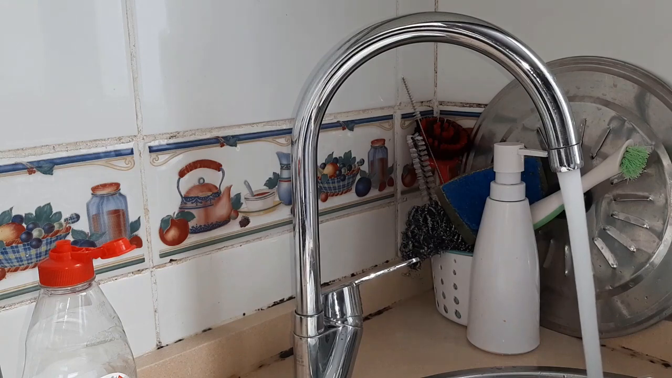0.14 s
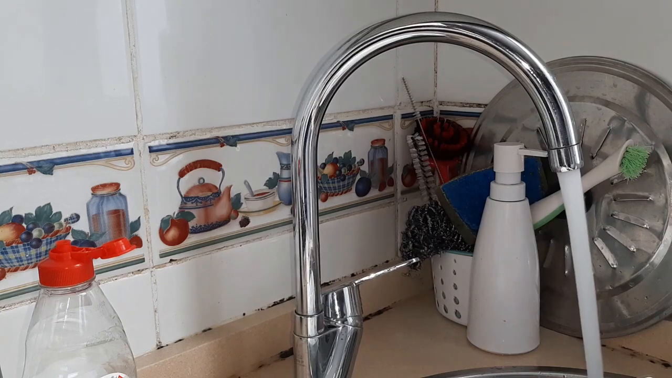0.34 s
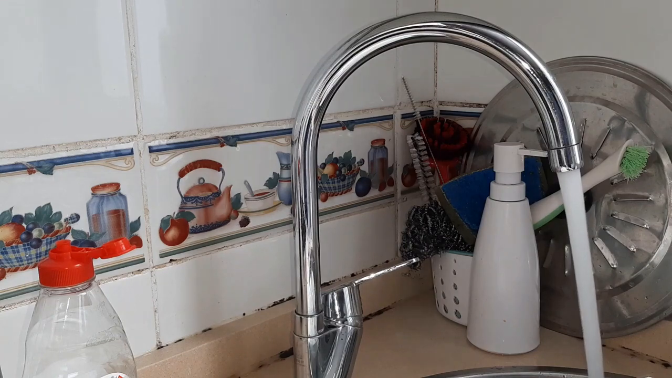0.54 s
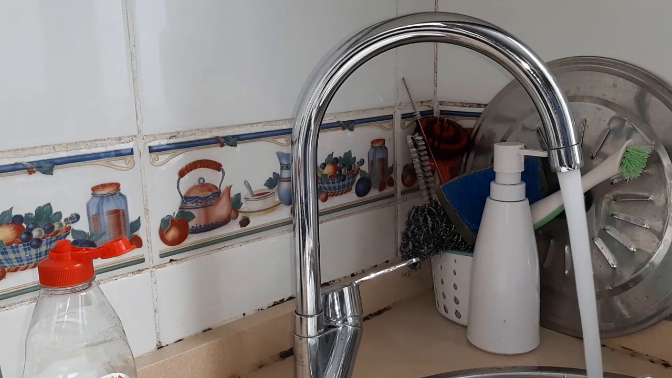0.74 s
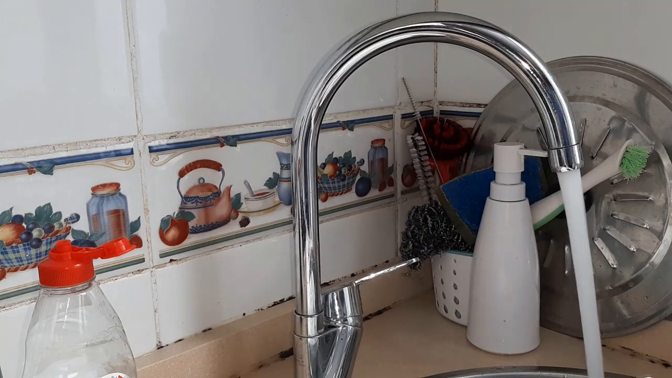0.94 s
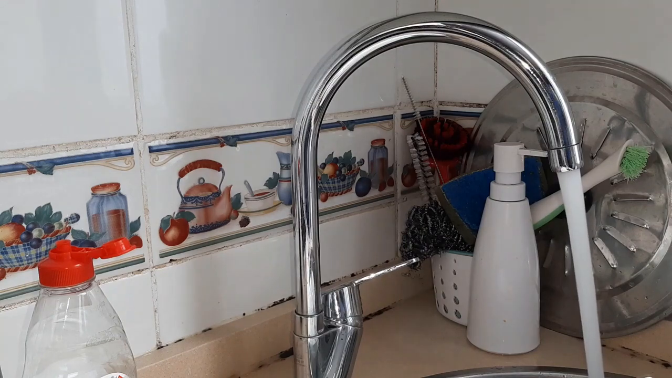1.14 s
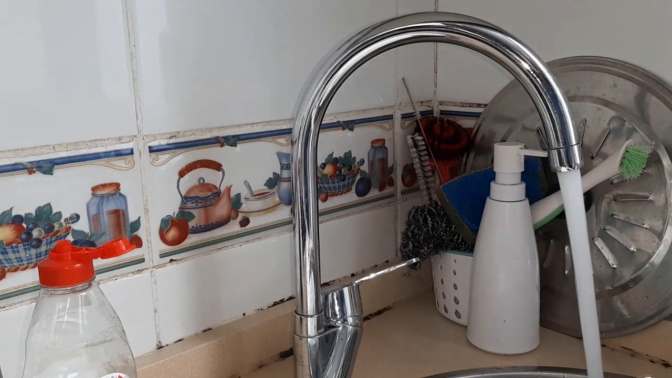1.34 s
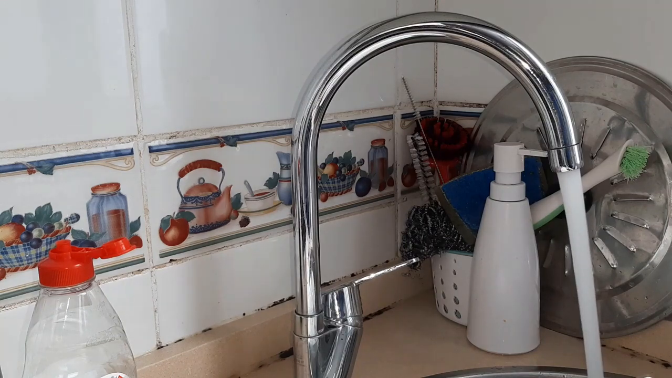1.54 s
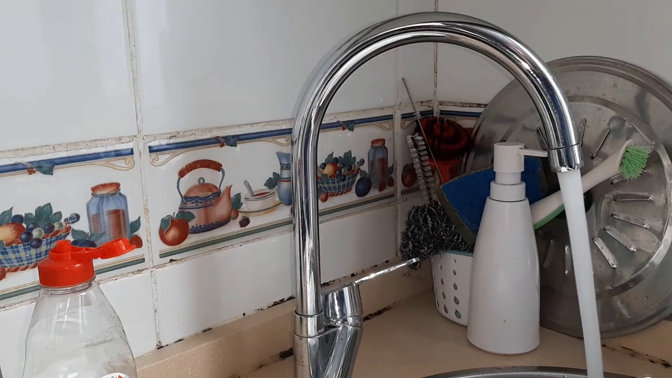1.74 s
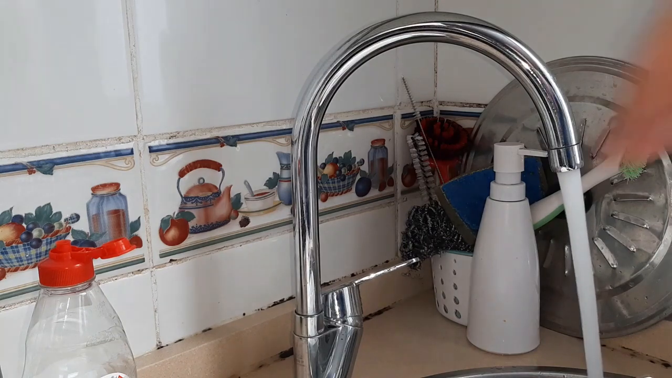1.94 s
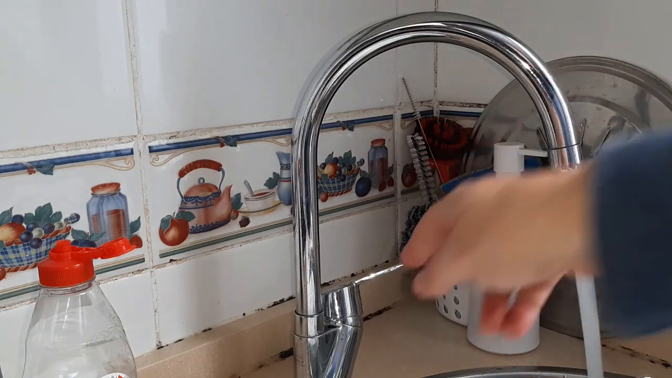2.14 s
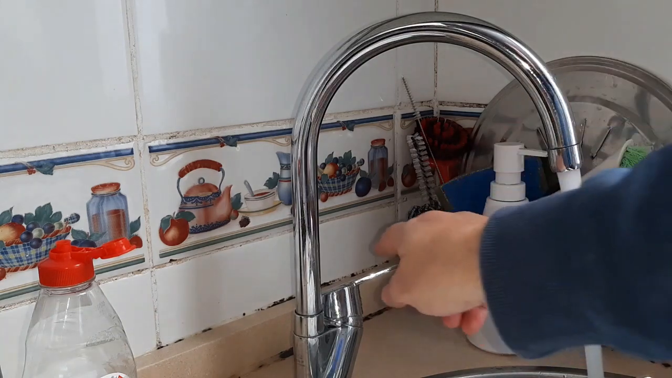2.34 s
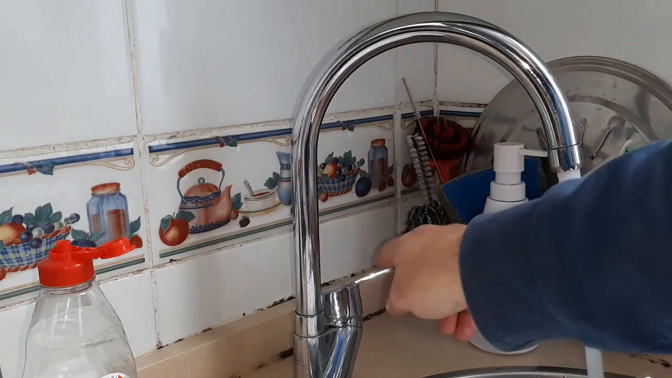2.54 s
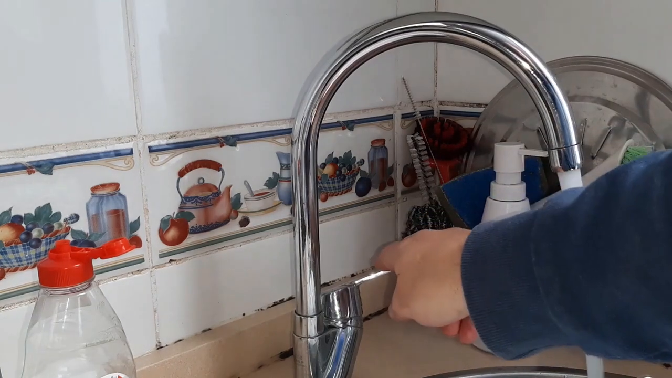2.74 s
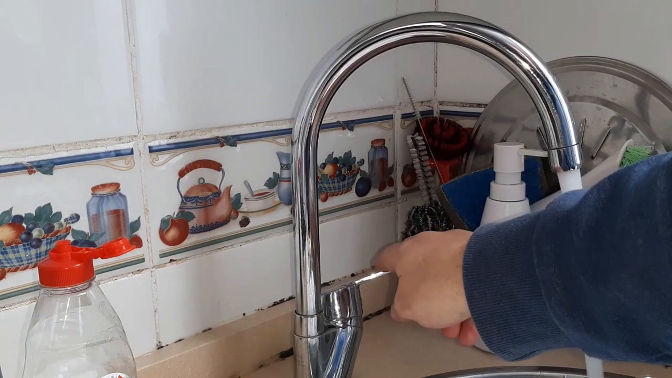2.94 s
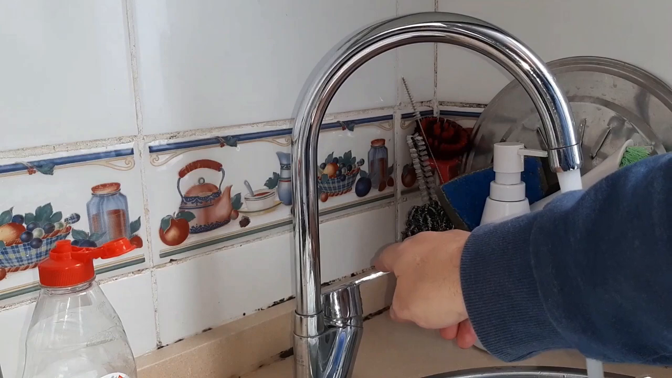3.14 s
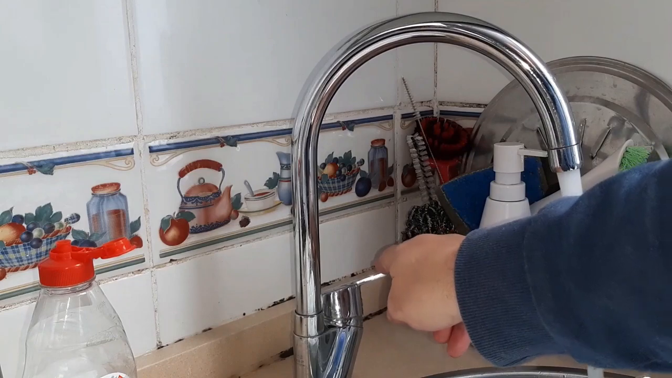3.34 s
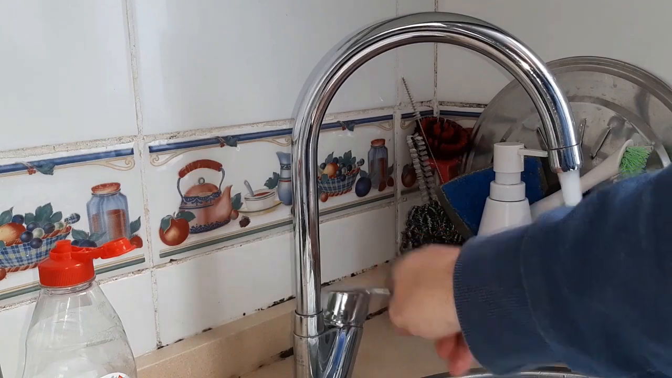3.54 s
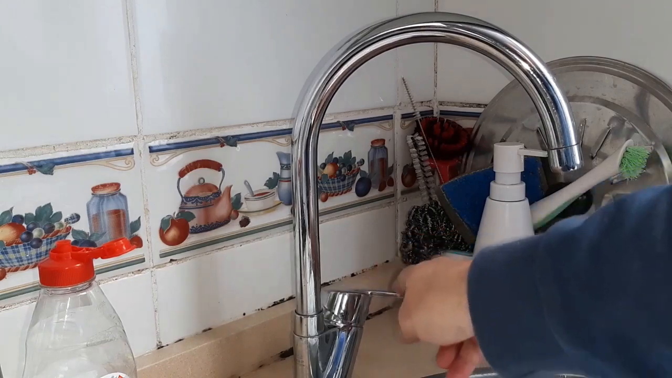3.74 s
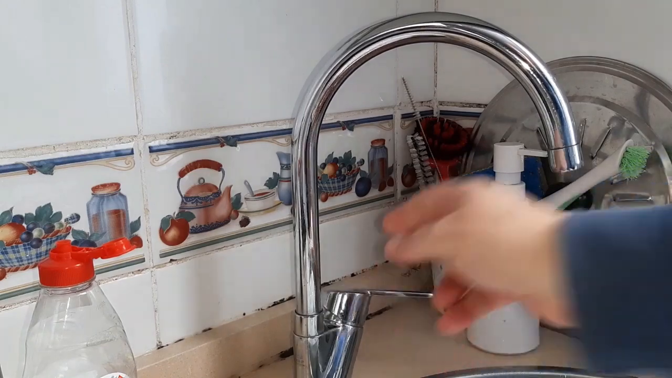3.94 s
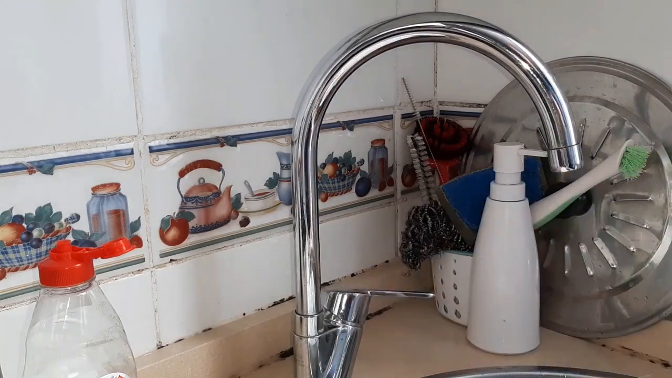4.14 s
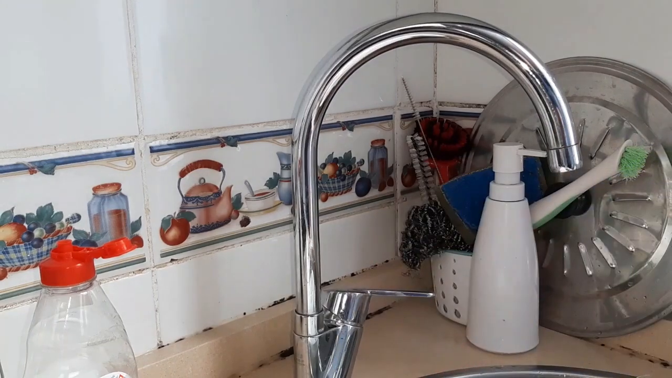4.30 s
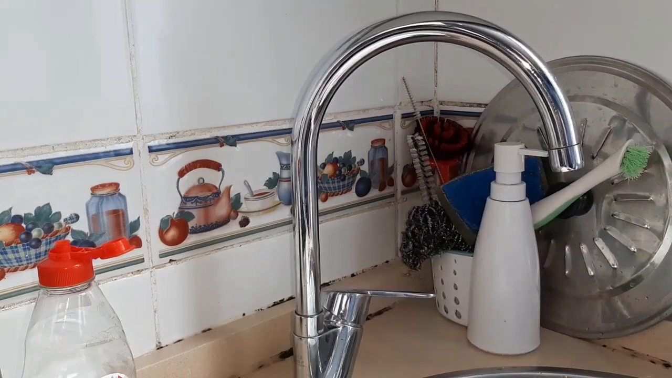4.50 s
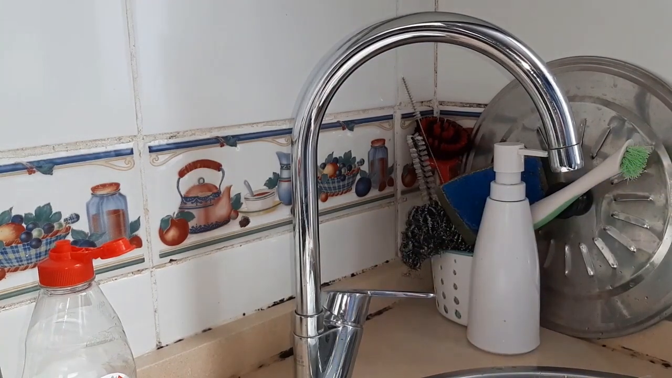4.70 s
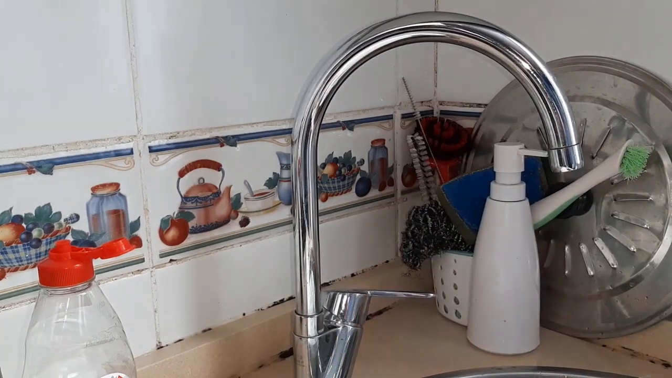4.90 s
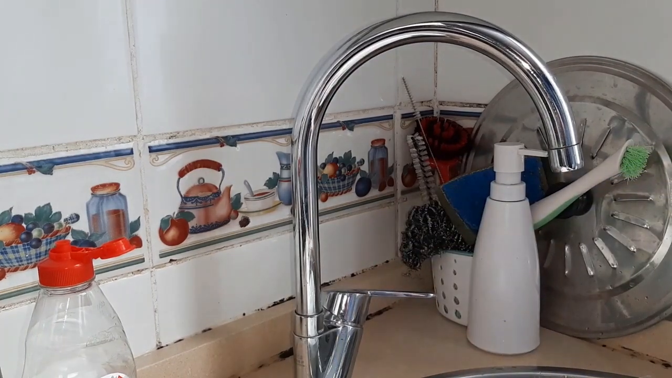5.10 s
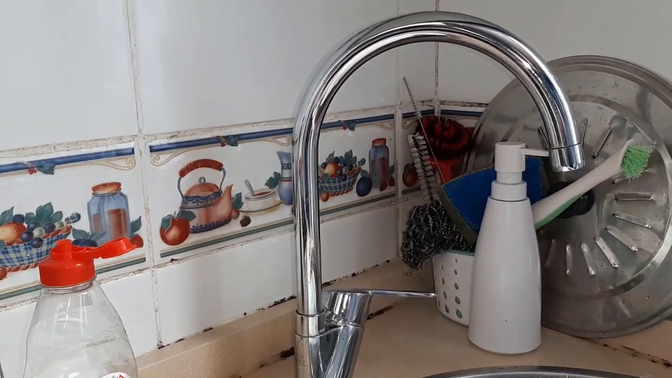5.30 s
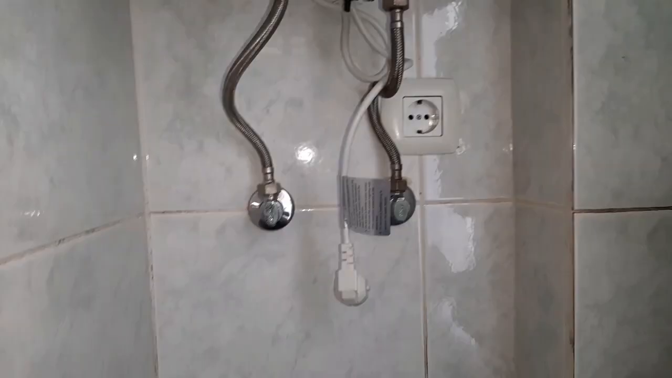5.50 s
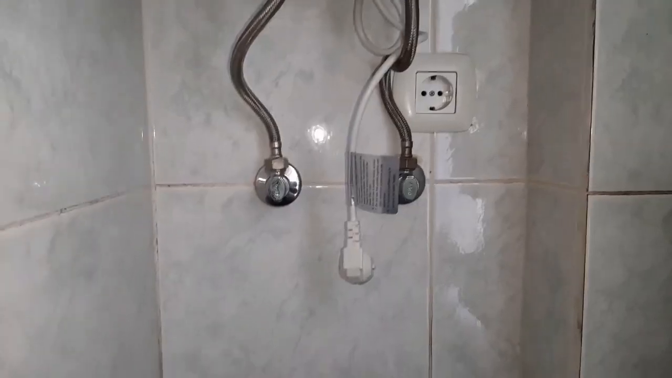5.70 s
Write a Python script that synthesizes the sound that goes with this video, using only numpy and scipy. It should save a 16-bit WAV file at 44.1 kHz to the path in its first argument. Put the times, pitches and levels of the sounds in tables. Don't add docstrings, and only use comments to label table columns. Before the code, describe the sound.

Uneven slugs of water beat a resonant metal sink for under four seconds while spray and aerator hiss steadily. The flow breaks off in a few stuttering thuds. Then come sparse plinking drips, a soft fizz and plughole gurgles, with fridge hum beneath. The phone is knocked softly, sound drops out, and a faint tiled room with a short high valve whistle fades in. Close stereo phone pickup.

```python
import sys
import numpy as np
from scipy import signal
from scipy.fft import rfft, irfft
from scipy.io import wavfile
from scipy.ndimage import uniform_filter1d

SR = 44100
rng = np.random.default_rng(int(sys.argv[2]) if len(sys.argv) > 2 else 0)


def level_to_linear(level):
    exponent = np.asarray(level, float) / 20
    return 10 ** exponent


def generate_wav(sig):
    pcm = np.round(np.clip(np.atleast_2d(sig).T, -1, 1) * 32767).astype(np.int16)
    wavfile.write(sys.argv[1], SR, pcm)


N = 254016
T = np.arange(N) / SR
HZ = np.maximum(np.fft.rfftfreq(N, 1 / SR), 1)

# time in seconds, spray level in dB, drumming of the steel against it in dB.
FLOW = [(0.0, -39.5, 9), (0.14, -39.5, 1), (1.0, -39, 2.5), (2.08, -39.5, 1.5), (2.36, -40.5, 1),
        (2.63, -40, 3.5), (3.0, -40, 3), (3.3, -40.5, 5), (3.47, -39, 0.5), (3.54, -42.5, 12),
        (3.57, -41, -4), (3.61, -42.5, 7.5), (3.65, -49.5, 19.5), (3.68, -42, 3), (3.71, -44, 13.5),
        (3.76, -49, 11.5), (3.98, -64.5, -14)]
# start in seconds, peak in dB, splash against it in dB.
SLUGS = [(0.057, -29.5, -7.5), (0.138, -26.5, -0.5), (0.202, -19.5, -11), (0.288, -26.5, -15),
         (0.321, -33, -25), (0.484, -28.5, -2), (0.648, -36, -13), (0.721, -25, -27), (0.754, -27.5, -15),
         (0.794, -26.5, -27), (0.85, -42, -19), (0.935, -31, -3), (0.959, -29.5, -27), (1.009, -28, -10),
         (1.05, -28, -7), (1.144, -29, -9), (1.195, -24, -11), (1.322, -26, -22), (1.379, -40, -13),
         (1.443, -40, -9), (1.472, -28, 0.5), (1.497, -29.5, 0), (1.532, -44, 1), (1.568, -27.5, -11),
         (1.668, -19.5, -9), (1.78, -28, -5), (1.824, -44.5, -14), (1.962, -24, -13.5), (2.089, -27, -2),
         (2.116, -27, -14), (2.28, -41, -8), (2.335, -44, -8), (2.392, -30, -19), (2.432, -20.5, -8),
         (2.469, -26, -11), (2.519, -50, -12), (2.634, -46, -13), (2.701, -20, -14.5), (2.753, -24, -12),
         (2.83, -29.5, -5), (2.896, -29.5, -10), (2.975, -25, -21), (3.083, -37, -16), (3.123, -24, -10.5),
         (3.174, -39, -16), (3.207, -44, -17), (3.228, -19.5, -13), (3.311, -25, -24), (3.366, -42, -16),
         (3.483, -33.5, -11), (3.522, -23.5, -13), (3.578, -23, -27), (3.601, -33, -16), (3.628, -28, -9),
         (3.695, -21.5, 1), (3.716, -24.5, -8.5)]
# start in seconds, peak in
# dB, pitch in Hz.
PLOPS = [(0.064, -24, 1030), (1.333, -24, 547), (0.18, -31.5, 964), (0.223, -24.5, 807), (0.292, -26, 812),
         (0.331, -28, 790), (0.416, -34, 790), (0.446, -27.5, 815), (0.483, -26, 973), (0.539, -33.5, 1020),
         (0.619, -47, 770), (0.65, -31, 770), (0.732, -36, 880), (0.761, -45, 840), (0.799, -25, 762),
         (0.848, -35, 810), (1.583, -21, 530), (1.146, -26, 800), (1.197, -27, 1060), (1.312, -31, 810),
         (1.397, -27, 796), (1.481, -33, 774), (1.51, -40, 970), (1.542, -32, 840), (1.575, -32, 800),
         (1.665, -24, 758), (1.739, -26.5, 770), (1.992, -31, 1166), (2.092, -28, 760), (2.206, -28, 1390),
         (2.264, -37, 804), (2.397, -25, 801), (2.429, -26.5, 755), (2.571, -36, 1010), (2.678, -40, 820),
         (2.707, -32.5, 950), (2.869, -39, 880), (2.895, -55, 754), (2.934, -30, 1030), (3.033, -31, 1005),
         (3.073, -29, 770), (3.104, -22.5, 780), (3.164, -32, 1020), (3.211, -31, 746), (3.237, -22.5, 812),
         (3.339, -37, 780), (3.531, -33, 800), (3.591, -31, 745), (3.632, -45, 720), (3.693, -34, 783)]
# start in seconds, peak in dB, pitch in Hz, T60 in
# seconds.
HAMMER = [
    (3.626, -29.5, 101, 0.3),
    (3.627, -34.5, 140, 0.087),
    (3.534, -23.5, 530, .12),
    (3.546, -23, 450, 0.035),
    (3.694, -22.5, 545, 0.053),
    (3.735, -25, 577, 0.059),
]
# start in seconds, peak in dB, pitch in Hz.
RINGS = [(0.057, -25, 515), (0.136, -34, 526), (0.203, -28, 556), (0.29, -33, 484), (0.32, -28, 558),
         (0.484, -26, 533), (0.721, -24, 509), (0.794, -35.5, 540), (0.851, -28.5, 460), (0.959, -24, 501),
         (1.009, -31.5, 576), (1.05, -31.5, 452), (1.143, -39, 515), (1.323, -36.5, 526),
         (1.379, -36.5, 471), (1.442, -44, 560), (1.471, -31, 537), (1.532, -35, 584),
         (1.567, -28.5, 542.6), (1.668, -36, 460), (1.78, -36.5, 555), (1.962, -28.5, 535),
         (2.089, -24, 516.4), (2.116, -31, 528), (2.335, -42, 495), (2.392, -26, 521), (2.432, -33, 544),
         (2.47, -37, 526), (2.52, -31.5, 403), (2.634, -35, 547), (2.753, -25, 517), (2.831, -32, 532),
         (2.896, -28, 531), (2.975, -23.5, 518), (3.123, -28.5, 571), (3.228, -34, 565), (3.366, -38, 400),
         (3.483, -30, 534)]
# start in seconds, peak in dB, pitch in Hz.
TICKS = [(0.059, -30, 1250), (0.13, -29, 1380), (0.182, -28, 1650), (0.2299, -32, 1520),
         (0.465, -29.5, 2340), (0.602, -41, 1980), (0.7576, -32, 1280), (0.8215, -33, 1380),
         (0.8749, -33.5, 1700), (0.9015, -30.5, 1550), (1.0803, -24, 1350), (1.3548, -35, 2400),
         (1.4296, -35, 2150), (1.481, -29, 1610), (1.6681, -31, 1290), (1.9719, -39, 1980),
         (2.0817, -28.5, 2000), (2.2787, -33, 2060), (2.3347, -31, 1710), (2.5296, -37, 2090),
         (2.577, -36, 1990), (2.7402, -29, 2260), (2.9866, -41, 2290), (3.0467, -29.5, 1710),
         (3.1752, -33, 1580), (3.234, -36, 1670), (3.3355, -38, 2000)]
# start in seconds, peak in dB, pitch in Hz.
THUDS = [(0.041, -43.5, 217), (0.323, -47, 140), (0.409, -40.5, 172.5), (0.659, -43.5, 306), (1, -43, 218),
         (1.481, -47, 177), (1.662, -52, 286), (1.788, -49, 201), (2.088, -39, 159), (2.583, -40, 322),
         (2.707, -47.5, 256), (3.299, -36, 326), (3.418, -46.5, 275), (3.516, -41, 294), (3.586, -45, 266),
         (3.729, -42, 257)]
# pitch in Hz, width in Hz, level in dB.
BOWL_MODES = [(399, 14.7, -2), (453.5, 21, -1.5), (509.4, 27.6, 2.5), (560, 22.4, 0), (606, 30, -8.5),
              (760, 19.6, -3.5), (825.4, 44, -6.5), (951, 33, -9.5), (1020, 47, -6.5), (1362, 61, -13.5),
              (1501, 50, -11.5), (1687, 17, -5), (1960, 11, -6), (2157, 69, -17)]
# pitch in Hz, width in Hz, level in dB.
COUNTER_MODES = [(80, 16.2, 0.5), (99.2, 26.2, 1), (116.7, 47.5, -4.5), (183, 52, -6), (250, 188, -11.5)]
# time in seconds, level in dB.
SURGES = [(0.076, -55), (0.198, -31), (0.309, -37), (0.416, -46.5), (0.575, -47), (0.575, -41.5),
          (0.707, -38), (0.707, -38.5), (0.787, -56), (0.893, -51.5), (0.972, -48), (1.067, -39.5),
          (1.219, -40), (1.27, -51), (1.428, -61), (1.429, -44), (1.491, -41.5), (1.676, -35), (1.676, -32),
          (1.76, -69), (1.824, -43.5), (2.02, -34), (2.161, -33), (2.299, -41), (2.426, -39), (2.585, -45),
          (2.692, -40), (2.769, -30.5), (2.901, -40), (2.96, -39), (3.084, -33), (3.213, -31),
          (3.39, -32.5), (3.527, -31)]
# frequency in Hz, density in dB per Hz.
SPRAY_COLOUR = [(150, -16), (300, -4.5), (700, -2.5), (1500, -3.5), (2500, -2), (3500, -3), (4600, -4),
                (5600, -3), (8000, -7.5), (9000, -7.5), (11000, -8.5), (17000, -12.5)]
# frequency in Hz, density in dB per Hz.
AERATOR_COLOUR = [(6000, -11), (9000, -6), (10500, -7), (12000, -2.5), (13200, 0), (14300, -0.5),
                  (15500, 1.5), (17000, -8.5)]
# frequency in Hz, width in Hz, level of the removed part in dB.
BOWL_NODE = (345, 35, -3)
# time in seconds, pitch in Hz.
HUM_PITCH = [(0, 100.2), (5.52, 99.65)]
# frequency in Hz, density in dB per Hz.
RUMBLE_COLOUR = [(15, -52), (25, -5), (48, -18), (102, -1.5), (125, -14), (198, -26), (254, -9.5),
                 (300, -16.5), (390, -55), (660, -120)]
# time in seconds, fizz level in dB.
FILM = [(3.75, -68), (3.9, -71), (4.0, -58.5), (4.2, -57.5), (4.47, -58.5), (4.65, -61), (5.05, -65.5),
        (5.2, -68.5), (5.52, -72)]
# frequency in Hz, density in dB per Hz.
FIZZ_COLOUR = [(850, -8), (1350, -14), (1750, -29), (2150, -11), (2850, -19), (3800, -6), (8070, -4.5),
               (15200, -5), (15900, -6), (16500, -38.5)]
# frequency in Hz, density in dB per Hz.
PLUGHOLE_COLOUR = [(82, 0), (140, 4), (177, -28), (257, -3), (382, -3), (494, -6.5), (1800, -14),
                   (2340, -48), (3960, -120)]
# start in seconds, level in dB.
GULPS = [
    (3.758, -41.5),
    (3.93, -65),
    (4.04, -83),
    (4.182, -57),
    (4.42, -60.5),
    (4.69, -67),
]
# frequency in Hz, width in Hz, level of the removed part in dB.
TRAP_BANDS = [(885, 320, -1), (2900, 680, -5)]
# start in seconds, peak in dB, pitch in Hz, width as a share of the pitch.
DRIPS = [(3.694, -29, 1994, 0.4), (3.712, -31, 4000, 0.17), (3.801, -35, 6800, 0.2),
         (3.815, -40, 2200, 0.18), (3.892, -37, 3950, 0.2), (3.893, -40, 7000, .13),
         (4.056, -42, 3060, .098), (4.181, -45, 345, 0.68), (4.183, -65, 169, 0.69),
         (4.186, -51, 1182, 0.14), (4.209, -40, 9600, 0.24), (4.354, -39, 2765, 0.44),
         (4.37, -37, 4070, 0.32), (4.373, -38, 5230, 0.63), (4.396, -43, 1960, .95),
         (4.412, -42, 1395, 0.96), (4.44, -43, 2560, 0.8), (4.427, -41.5, 998, 0.96),
         (4.489, -44, 2290, 0.31), (4.647, -40, 3280, 0.27), (4.648, -42, 2420, 0.24),
         (4.65, -44, 4940, 0.33), (4.548, -52, 1320, .3), (4.651, -53.5, 897, 0.37),
         (4.897, -47, 2690, .08), (4.893, -50, 4630, .12), (4.947, -49, 1910, 0.15), (4.96, -50, 1930, .12),
         (4.896, -52, 3250, .08), (4.977, -53, 6470, .15), (4.99, -56, 1750, .3), (5.03, -48.5, 1480, 0.11),
         (5.035, -48, 6500, .6), (5.096, -66, 1920, .5), (5.1, -59, 5300, 0.18), (5.315, -58, 2070, 0.046),
         (5.326, -52, 5070, 0.35), (5.348, -53, 2100, 0.038), (5.37, -65, 1390, .15),
         (5.406, -60, 1400, .1), (5.44, -63, 2170, .04), (5.421, -54, 4670, .2), (5.015, -51, 1470, 0.1),
         (5.035, -48, 4000, .06), (5.064, -46.5, 1497, 0.097), (5.068, -53, 1870, 0.11),
         (5.097, -47, 6560, 0.4), (5.177, -51, 1510, 0.11), (5.118, -56, 3940, .15),
         (5.14, -63, 3900, 0.11), (5.421, -49, 7700, 0.34)]
# start in seconds, level in dB, pitch in Hz, T60 in seconds, swell in seconds.
BUMPS = [
    (5.3403, 6.5, 232, .015, .03),
    (5.3484, -7, 298, .022, .014),
    (5.360, -40, 100, .12, .002),
    (5.366, -58, 330, .08, .004),
    (5.349, -47, 540, .04, .002),
    (5.3435, -36, 150, .04, .002),
]
# frequency in Hz, density in dB per Hz.
NEXT_ROOM_COLOUR = [(35, -46), (60, -12), (240, -14), (350, -7.5), (464, -8), (559, -33), (815, -15),
                    (983, -18.5), (1380, -8), (1500, -19), (4320, -20), (14300, -32), (16500, -38)]
# frequency in Hz, width in Hz, depth from 0 to 1.
ECHO_DIPS = [(2845, 103, 0.41), (3230, 56, 1), (4490, 150, 0.4), (5050, 130, 0.32), (6260, 160, 0.5),
             (6800, 59, 0), (8440, 91, 0.4), (8670, 760, 0.31), (9120, 190, 1), (9640, 116, 0.97),
             (10320, 370, 0.33)]
# frequency in Hz, likeness from 0 to 1.
LIKENESS = [(25, 0.95), (60, 0.9), (250, 0.74), (640, 0.83), (1400, 0.18), (2800, 0.19), (8000, 0),
            (16000, 0)]
# frequency in Hz, left minus right in dB.
BALANCE = [(35, -2), (60, -9), (110, 11.5), (200, -1.5), (380, -2), (700, 2), (1290, -1.5), (2380, -0.5),
           (4400, 1), (8120, 0.5), (15000, -0.5)]

VALVE_S, VALVE_RAMP_S, VALVE_DB = 3.62, 0.0295, -8
CUT_S, TAIL_S, TAIL_DB = 5.5185, 0.018, -26


def unit(x):
    return x / np.sqrt(np.mean(x ** 2))


def curve(table, quiet_db=-200):
    s, first, *rest = np.transpose(table)
    level = np.interp(T, s, first, quiet_db, quiet_db)
    return [level] + [np.interp(T, s, column) for column in rest]


def on_hz(points):
    f, value = np.transpose(points)
    return np.interp(np.log(HZ), np.log(f), value)


def ring(x, modes):
    gain = 0
    for k, (f, width, db) in enumerate(modes):
        damping = 1j * width * HZ
        gain = gain + (-1) ** k * level_to_linear(db) * damping / (f ** 2 - HZ ** 2 + damping)
    return irfft(rfft(x) * gain, N)


def walk(rate, spread_db):
    hold = int(SR / 32 / rate)
    steps = np.repeat(rng.standard_normal(N // 32 // hold + 2), hold)
    db = 1.43 * spread_db * uniform_filter1d(uniform_filter1d(steps, hold), hold)
    return np.interp(T, np.arange(len(db)) * 32 / SR, level_to_linear(db))


def patter(rate, spread_db, tail_s):
    landed = rng.random(N) < rate / SR
    hits = landed * level_to_linear(2 * spread_db * rng.exponential(size=N))
    power = signal.lfilter([1], [1, -np.exp(-1 / (tail_s * SR))], hits)
    return unit(np.sqrt(power + 1e-9))


def hiss(points, gate, flicker_db, rate):
    spec = rfft(gate * rng.standard_normal((2, N))) * level_to_linear(on_hz(points))
    lowest, highest = np.log2(points[0][0]), np.log2(points[-1][0])
    out = 0
    for centre in np.arange(lowest, highest + 1 / 2, 1 / 2):
        share = np.clip(1 - 2 * np.abs(np.log2(HZ) - centre), 0, 1)
        out = out + walk(rate, flicker_db) * irfft(spec * share, N)
    return unit(out)


def burst(s, t60, rise_s):
    i = int(s * SR)
    t = np.arange(min(int(t60 * SR) + 99, N - i)) / SR
    decay = np.exp(-np.log(1000) * t / max(t60, .005))
    return i, t, (1 - np.exp(-t / rise_s)) * decay


def drummed_bowl():
    beat = patter(rate=440.0, spread_db=1.94, tail_s=0.0042)
    bowl = unit(ring(beat * rng.standard_normal((2, N)), BOWL_MODES))
    return unit(bowl / (uniform_filter1d(bowl ** 2, size=900) + .1) ** 0.19)


def counter_boom():
    shake = level_to_linear(-48.5)
    for s, db in SURGES:
        shake = shake + level_to_linear(db - 16.5) * np.exp(-((T - s - 0.021) / 0.025) ** 2)
    shake = shake * level_to_linear(-250 * np.maximum(T - 3.77, 0))
    boom = unit(ring(walk(17.0, spread_db=5.5) * rng.standard_normal((2, N)), COUNTER_MODES))
    boom = unit(boom / np.sqrt(uniform_filter1d(boom ** 2, size=1800) + 0.091))
    return shake * boom * walk(12., spread_db=1.)


def spray_and_aerator():
    closing = np.clip((T - VALVE_S) / VALVE_RAMP_S, 0, 1)
    aerator_db = 1 - 0.5 * T + VALVE_DB * closing
    drops = patter(rate=2000.0, spread_db=2.0, tail_s=0.0081)
    bubbles = patter(rate=3600.0, spread_db=-0.5, tail_s=0.0011)
    spray = hiss(SPRAY_COLOUR, drops, flicker_db=0.43, rate=14.)
    return spray + level_to_linear(aerator_db) * hiss(AERATOR_COLOUR, bubbles, flicker_db=0.8, rate=18.0)


def slugs():
    blow, splash = np.zeros((2, 2, N))
    sides = rng.choice([-1, 1], len(SLUGS))
    for (s, db, splash_db), side in zip(SLUGS, sides):
        i, t, env = burst(s, .04, .0015)
        blow[:, max(i - 260, 0)] = level_to_linear(db) * np.array([1, side])
        splash[:, i:i + len(t)] += level_to_linear(db + splash_db) * env
    thud = ring(blow, [mode for mode in BOWL_MODES if mode[0] < 1200])
    spatter = ring(splash * rng.standard_normal((2, N)), [(1480, 1380, 3.5), (2200, 1400, 0.5)])
    return level_to_linear(36) * thud + level_to_linear(10.5) * spatter


def plops():
    out = np.zeros((2, N))
    rise_s = 0.001963
    rows = [(s, db - 2, hz, 0.066) for s, db, hz in PLOPS] + HAMMER
    for (s, db, hz, t60), side in zip(rows, rng.choice([-1, 1], len(rows))):
        i, t, env = burst(s - rise_s, t60, rise_s)
        tone = np.sin(2 * np.pi * hz * t) + 0.25 * np.sin(2 * np.pi * hz * 1.3 * t)
        out[:, i:i + len(t)] += level_to_linear(db) * env * tone * np.array([[1], [side]])
    return out


def knocks():
    out = np.zeros((2, N))
    kinds = [(RINGS, -8, 0.12, 0.009045), (TICKS, -5, .035, .0008), (THUDS, -3, 0.13, .006)]
    for rows, trim_db, t60, rise_s in kinds:
        for k, (s, db, hz) in enumerate(rows):
            i, t, env = burst(max(s - rise_s, 0), t60, rise_s)
            tone = env / env.max() * np.sin(2 * np.pi * hz * t)
            out[:, i:i + len(t)] += level_to_linear(db + trim_db) * tone * np.array([[1], [(-1) ** k]])
    return out


def tap():
    spray_db, drum_db = curve(FLOW)
    out = level_to_linear(spray_db + drum_db - 4.5) * drummed_bowl() + counter_boom()
    out = out + level_to_linear(spray_db + 3.5) * spray_and_aerator()
    out = out + slugs() + plops() + knocks()
    return out - ring(out, [BOWL_NODE])


def kitchen():
    s, hz = np.transpose(HUM_PITCH)
    phase = 2 * np.pi * np.cumsum(np.interp(T, s, hz)) / SR
    tone = np.sin(phase) + level_to_linear(-30.5) * np.sin(2 * phase) + level_to_linear(-14.0) * np.sin(phase / 2)
    hum = level_to_linear(-61.5) * walk(23.0, spread_db=1.5) * np.sqrt(2) * tone
    rumble = level_to_linear(-72.5) * hiss(RUMBLE_COLOUR, 1, flicker_db=-2.0, rate=6.2)
    return hum * np.array([[1], [.15]]) + rumble


def draining_film():
    fizz_db, = curve(FILM)
    beads = patter(rate=900.0, spread_db=4.0, tail_s=0.021)
    fizz = hiss(FIZZ_COLOUR, beads, flicker_db=-1.5, rate=6.8)
    trickle_colour = [(1200, -4.5), (2400, -1.5), (4000, -3.0), (6000, -4.0), (9000, -24)]
    trickle = hiss(trickle_colour, beads, flicker_db=1.5, rate=20.0)
    rustle = hiss(PLUGHOLE_COLOUR, 1, flicker_db=5.0, rate=11.0)
    gulp = level_to_linear(-71.5 - 3 * (T - VALVE_S))
    for s, db in GULPS:
        i, t, env = burst(s, 0.33, 0.0019)
        gulp[i:i + len(t)] += level_to_linear(db) * env
    runoff = np.zeros(N)
    for s, db, hz, share in DRIPS:
        if 1500 < hz < 8000:
            i, t, env = burst(s, 0.4, 0.0043)
            runoff[i:i + len(t)] += level_to_linear(db - 29) * env
    out = level_to_linear(fizz_db + 0.5) * (fizz + level_to_linear(-5) * trickle)
    out = out + runoff * trickle + gulp * rustle * (T > 3.75)
    trap_full = np.clip((T - 4.95) / 0.2, 0, 1)
    return out - trap_full * sum(ring(out, [band]) for band in TRAP_BANDS)


def drips():
    out = np.zeros((2, N))
    ragged = patter(rate=900, spread_db=1.6, tail_s=.002)
    for s, db, hz, share in DRIPS:
        t60 = min(0.19 * (1000 / hz) ** 0.55, .3)
        rise_s = 0.0012 * min(1000 / hz, .7) ** 2
        i, t, env = burst(s, t60, rise_s)
        pole = np.exp(2j * np.pi * hz / SR - np.pi * np.clip(share, .01, 1.5) * hz / SR)
        resonator = np.poly([pole, pole.conj()] * 2).real
        cavity = signal.lfilter([1, 0, -1], resonator, rng.standard_normal((2, 16000)))
        drip = unit(env * ragged[i:i + len(t)] * cavity[:, -len(t):])
        out[:, i:i + len(t)] += level_to_linear(db - 10.0) * drip * np.sqrt(np.mean(env ** 2))
        tick = np.diff(rng.standard_normal((2, 16000)))[:, :len(t)]
        out[:, i:i + len(t)] += level_to_linear(db - 15.5) * np.exp(-t / 0.0032) * tick
    return out


def thumb():
    out = np.zeros(N)
    for s, db, hz, t60, swell_s in BUMPS:
        i, t, env = burst(s, t60, .003)
        swell = 1 - np.exp(-t / swell_s)
        out[i:i + len(t)] += level_to_linear(db) * env * swell * np.sin(2 * np.pi * hz * t)
    after = T - BUMPS[0][0] - .0015
    contact = rng.standard_normal(N) * np.exp(-np.abs(after) / 0.012) * (after > 0)
    click = ring(contact, [(696, 310, 7), (4200, 1200, 0), (7700, 2000, 4)])
    return (out + level_to_linear(-51) * click) * level_to_linear(np.array([[-5.], [3.]]))


def next_room():
    start_s = 5.588
    fade = np.clip((T - start_s) / 0.035, 0, 1) ** 2 * level_to_linear(-76.5 + 9.5 * (T - start_s))
    swell = level_to_linear(10 * np.clip((T - 5.715) / .035, 0, 1))
    pipe_modes = [(450, 130, -3.0), (614, 140, -4), (1380, 160, -7.5), (2100, 200, -8), (4000, 500, -12)]
    pipe = unit(ring(rng.standard_normal((2, N)), pipe_modes))
    whistle = unit(ring(rng.standard_normal((2, N)), [(7800, 150, 0)]))
    whistle = whistle * np.exp(-np.abs(T - 5.61) / .04)
    air = hiss(NEXT_ROOM_COLOUR, 1, flicker_db=1.0, rate=16)
    mix = level_to_linear(2.0) * air * np.sqrt(swell) + level_to_linear(-4.5) * swell * pipe + level_to_linear(-1) * whistle
    return fade * mix * level_to_linear(np.array([[2.5], [-2.5]]))


def tiles(pair):
    t60 = 0.1
    t = T[:int(t60 * SR)]
    echo = rng.standard_normal(len(t)) * np.exp(-np.log(1000) * t / t60)
    echo = level_to_linear(-13) * rfft(echo / np.sqrt(np.sum(echo ** 2)), N)
    echo = echo * HZ ** 2 / (HZ ** 2 + 400.0 ** 2)
    hz, s, cells = signal.stft(irfft(rfft(pair) * (1 + echo), N), SR, nperseg=1024)
    gain = 1
    for f, width, dip in ECHO_DIPS:
        smooth = int(SR / 512 / 16.)
        slide, wander = 1.7 * uniform_filter1d(rng.standard_normal((2, len(s))), smooth)
        depth = np.clip(dip * (1 + 0.9 * wander), 0, .92)
        offset = hz[:, None] - f * (1 + 0.012 * slide)
        gain = gain * (1 - depth / (1 + (2 * offset / width) ** 2))
    return signal.istft(cells * gain, SR, nperseg=1024)[1][:, :N]


def ports(pair):
    like = np.clip(on_hz(LIKENESS), 0, .99)
    common, apart = rfft(pair)
    mid = common * np.sqrt((1 + like) / 2)
    side = apart * np.sqrt((1 - like) / 2)
    lean = level_to_linear(on_hz(BALANCE) / 2)
    lag = np.exp(-2j * np.pi * HZ * 3.98 / SR - 1j * 0.43)
    return level_to_linear(2.5) * irfft([(mid + side) * lean * lag, (mid - side) / lean], N)


def scene():
    gate = np.where(T < CUT_S, 1, level_to_linear(TAIL_DB) * (T < CUT_S + TAIL_S))
    water = tap() + draining_film() + drips()
    first_room = ports(tiles(water) + kitchen()) + thumb()
    return first_room * gate + level_to_linear(4.0) * next_room()


def band_limit(x):
    return signal.sosfilt(signal.butter(12, 17060, fs=SR, output="sos"), x)


def record(dry):
    x = signal.sosfilt(signal.butter(2, 35., "high", fs=SR, output="sos"), dry)
    x = signal.sosfilt(signal.ellip(20, .3, 130, 15720, fs=SR, output="sos"), x)
    return band_limit(x)


dry = scene()
out = record(dry)
generate_wav(out)
```